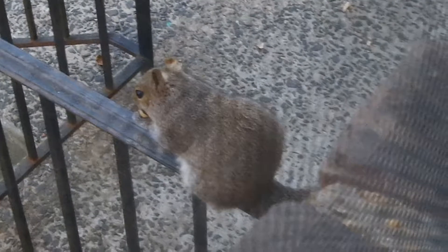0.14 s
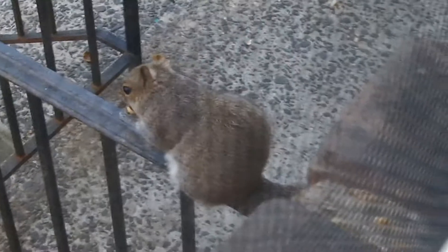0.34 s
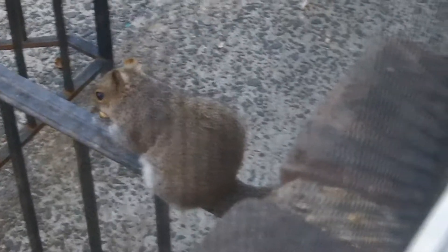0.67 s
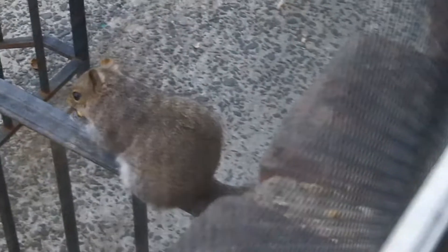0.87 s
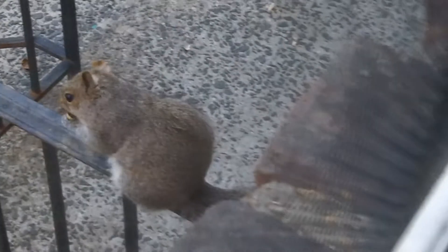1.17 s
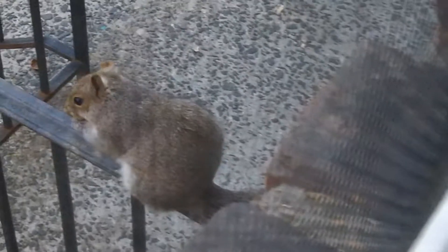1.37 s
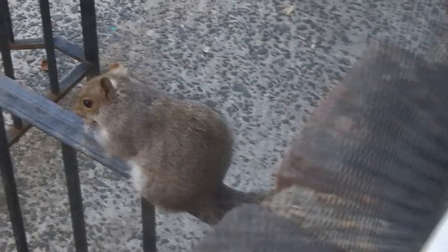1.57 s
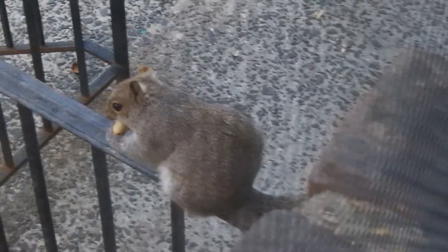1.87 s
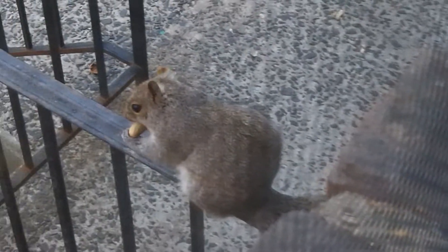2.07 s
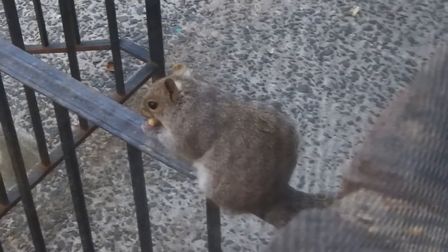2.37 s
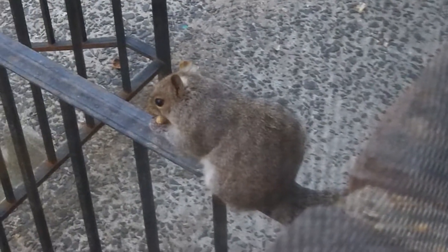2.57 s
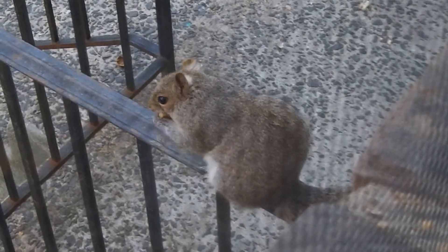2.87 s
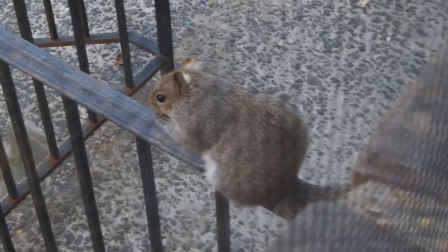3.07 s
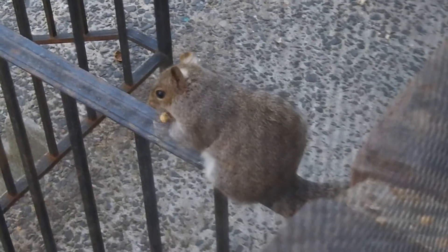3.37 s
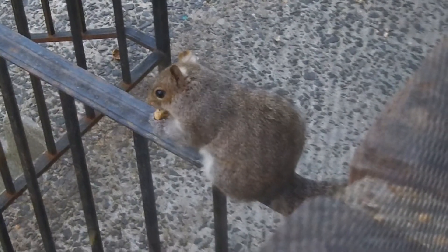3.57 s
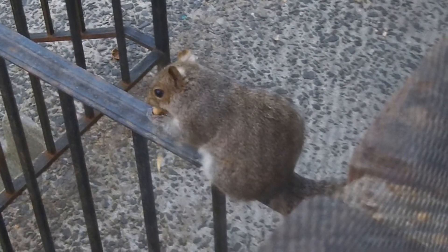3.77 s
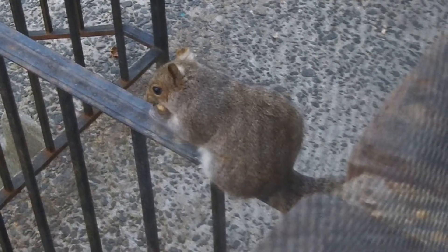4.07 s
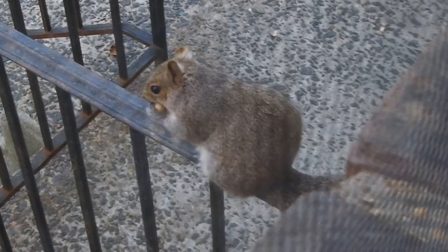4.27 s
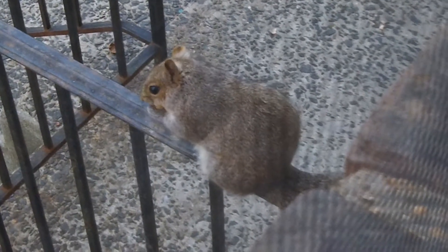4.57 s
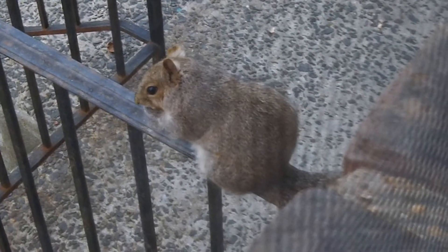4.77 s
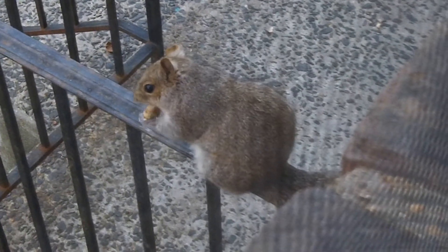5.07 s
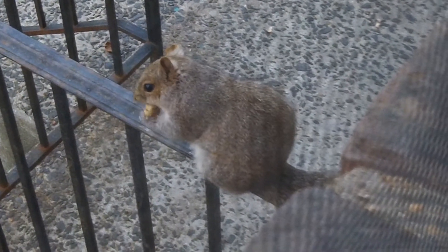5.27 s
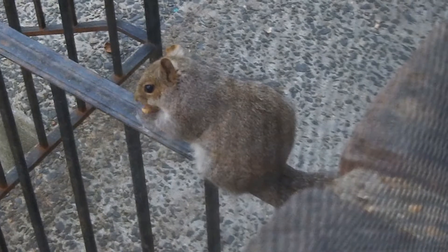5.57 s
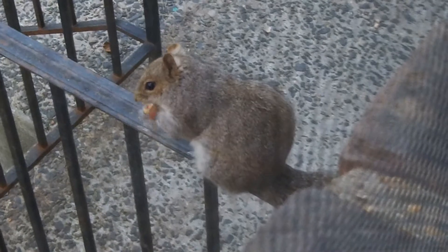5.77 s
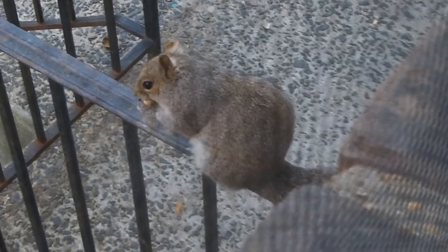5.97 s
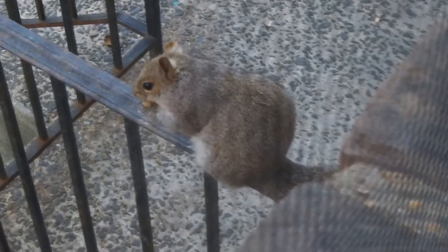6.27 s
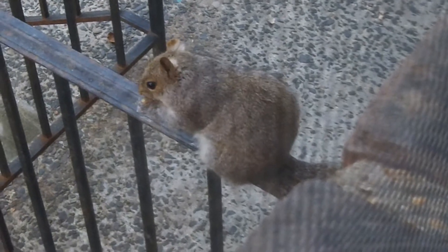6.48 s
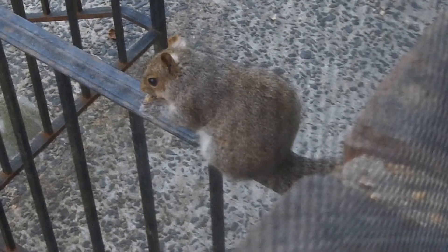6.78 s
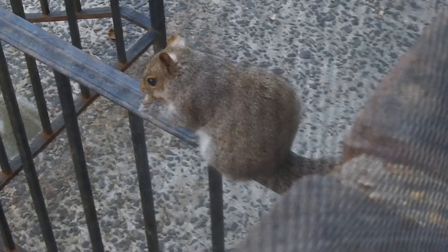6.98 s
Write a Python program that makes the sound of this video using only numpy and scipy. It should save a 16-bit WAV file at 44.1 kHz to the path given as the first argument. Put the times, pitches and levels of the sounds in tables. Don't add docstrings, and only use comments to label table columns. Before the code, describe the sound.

Outdoor mono sound with low distant traffic and soft hiss. Small teeth rasp and crack a hollow, papery nutshell: scratchy crunches first, sharp splintering snaps in the middle, lighter nips later. Paws rustle the nut faintly, and teeth occasionally squeak. One hard click-like tap on the microphone body overloads it late on; the level ducks and quickly recovers, with small scrapes and cracks to finish.

```python
import sys
import numpy as np
from scipy import signal
from scipy.fft import rfft, irfft, next_fast_len
from scipy.io import wavfile
from scipy.ndimage import uniform_filter1d, map_coordinates

SR = 44100
rng = np.random.default_rng(int(sys.argv[2]) if len(sys.argv) > 2 else 0)


def convert_level_to_amplitude(level_db):
    exponent = np.asarray(level_db, float) / 20
    return 10 ** exponent


def transcribe(u):
    v = np.clip(np.atleast_2d(u).T, -1, 1)
    q = np.round(v * 32767).astype(np.int16)
    wavfile.write(sys.argv[1], SR, q)


N = 314433

# f/Hz, width/Hz, level/dB
SHELL_MODES = [(545, 133, -7), (852, 172, -1), (1363, 304, -1.5), (2400, 830, -4.5), (3740, 710, -8)]


def unit(x):
    return x / np.sqrt(np.mean(x ** 2) + 1e-20)


def curve(rows):
    s, value = np.transpose(rows)
    return np.interp(np.arange(N) / SR, s, value)


def wobble(knots_per_s):
    knots = rng.standard_normal(int(N * knots_per_s / SR) + 4)
    return map_coordinates(knots, [np.arange(N) * knots_per_s / SR])


def filtered(x, response):
    m = next_fast_len(N + 8192)
    return irfft(rfft(x, m) * response(np.fft.rfftfreq(m, 1 / SR)), m)[:N]


def modes(table):
    def response(f):
        total = 0
        for k, (center_hz, width_hz, db) in enumerate(table):
            damping = 1j * f * width_hz
            total = total + (-1) ** k * convert_level_to_amplitude(db) * damping / (center_hz ** 2 - f * f + damping)
        return total
    return response


def rush(spectrum, patchy_db):
    z = signal.stft(rng.standard_normal(N), nperseg=512)[2]
    field = uniform_filter1d(rng.standard_normal(z.shape), 5, 0)
    field = uniform_filter1d(field, 10, 1)
    x = signal.istft(z * convert_level_to_amplitude(patchy_db * unit(field)), nperseg=512)[1][:N]
    hz, db = np.transpose(spectrum)
    return unit(filtered(x, lambda f: convert_level_to_amplitude(np.interp(np.log(f + 1), np.log(hz), db))))


def street():
    # f/Hz, density/dB
    traffic_spectrum = [(15, -24), (25, -8.5), (60, -9.5), (95, -5.5), (128, -10), (160, -1.5), (185, -5),
                        (208, -8), (240, -2.5), (280, -8.5), (400, -11.5), (700, -17), (1000, -18),
                        (1300, -66)]
    # f/Hz, density/dB
    air_spectrum = [(300, -13), (700, -2), (1500, -1.5), (3400, -8), (6700, -15.5), (11000, -19),
                    (13000, -19), (16500, -20)]
    # t/s, level/dB
    traffic_swell = [(0.0, -43.5), (0.44, -45), (4.19, -44), (4.35, -46), (5.98, -43), (6.13, -43.5),
                     (7.13, -44)]
    rumble = convert_level_to_amplitude(curve(traffic_swell) + 2) * rush(traffic_spectrum, patchy_db=-0.3)
    hiss = convert_level_to_amplitude(-46.5) * rush(air_spectrum, patchy_db=2.1)
    return rumble + hiss


def knock():
    # t/s, ring f/Hz, extra f at contact/Hz, peak/dB, t60/s
    blow_settings = (6.17805, 1060, 2400, 8, .00075)
    # delay/s, width/s, level/dB
    pulse_settings = (.00102, .00017, -15.5)
    s, hz, extra_hz, db, t60_s = blow_settings
    pulse_delay_s, pulse_width_s, pulse_db = pulse_settings
    glide_s = .00055
    t = np.maximum(np.arange(N) / SR - s, 0)
    onset = 1 - np.exp(-(t / .00026) ** 3)
    blow = convert_level_to_amplitude(db - 60 * np.maximum(t - .00068, 0) / t60_s) * onset
    cycles = hz * t + extra_hz * glide_s * (1 - np.exp(-t / glide_s))
    rattle_force = convert_level_to_amplitude(-11 - 60 * t / .025) * (t > 0) * rng.standard_normal(N)
    rattle = filtered(rattle_force, modes(SHELL_MODES))
    pulse = convert_level_to_amplitude(pulse_db) * np.exp(-((t - pulse_delay_s) / pulse_width_s) ** 2)
    return -blow * np.sin(2 * np.pi * cycles) + rattle + pulse


def squeaks():
    # t/s, length/s, first f/Hz, last f/Hz, level/dB
    clear_squeaks = [(1.175, .04, 6150, 6500, -28), (1.205, .04, 6500, 6750, -30),
                     (1.24, .13, 6620, 6750, -42), (1.35, .045, 6800, 7700, -50),
                     (3.88, .07, 3200, 3260, -42), (3.995, .14, 3060, 3100, -39),
                     (3.995, .028, 3700, 3640, -39), (4.025, .065, 3490, 3450, -41),
                     (5.06, .25, 6130, 6760, -56), (5.614, .008, 1800, 1700, -30),
                     (5.614, .009, 850, 780, -34), (4.985, .035, 6400, 6200, -52),
                     (3.93, .2, 6480, 6620, -56)]
    # t/s, length/s, first f/Hz, last f/Hz, level/dB
    rasping_squeaks = [(.505, 0.037, 4300, 3480, -39.5), (.536, 0.04, 3600, 4150, -40),
                       (.98, 0.13, 3200, 3180, -34.5), (3.7, 0.26, 3100, 3090, -43),
                       (3.73, 0.23, 8600, 8160, -49), (3.93, 0.38, 6380, 6900, -45),
                       (4.15, .1, 3700, 3640, -39), (5.54, .12, 4110, 3750, -43.5)]
    # share of length, level/dB
    slide_grip = [(0, -12), (.25, -1.5), (.7, -3.5), (1, -6)]
    out = np.zeros(N)
    for rows, fuzz in (clear_squeaks, .3), (rasping_squeaks, .5):
        waver = wobble(120)
        grip = 1 - fuzz + fuzz * (wobble(800) + .8 * wobble(2600))
        flutter = wobble(60)
        for s, length_s, first_hz, last_hz, db in rows:
            a, b = round(s * SR), round((s + length_s) * SR)
            u = np.linspace(0, 1, b - a)
            pitch_hz = (first_hz + (last_hz - first_hz) * u) * (1 + .012 * fuzz * waver[a:b])
            level_db = db + np.interp(u, *np.transpose(slide_grip)) + 2 + 3 * flutter[a:b]
            out[a:b] += convert_level_to_amplitude(level_db) * grip[a:b] * np.sin(2 * np.pi * np.cumsum(pitch_hz) / SR)
    return out


def fibres():
    # t/s, peak/dB, ring f/Hz, thud/dB
    crunches = [(0.0523, -18.5, 3530, -1), (0.6185, -25.5, 2540, 11), (1.1228, -23, 3320, -6),
                (1.14, -21, 2540, -3), (1.259, -14, 3150, 3), (1.3436, -16.5, 3660, -1.5),
                (1.3527, -25, 5640, -8), (1.695, -28, 2540, 2), (1.7064, -17, 5700, 4),
                (1.7062, -19, 2540, -2), (1.8208, -28, 3750, -9), (2.1054, -28, 3320, -6),
                (2.1778, -12.5, 2630, -1), (2.1812, -16, 3190, -7), (2.1987, -22, 3060, -1),
                (2.208, -22, 3490, 0), (2.2117, -26, 3620, -2), (3.2097, -16.5, 2920, -22),
                (4.2389, -21, 4740, -4), (4.3087, -28.5, 3660, -12), (4.4412, -23, 3300, -13),
                (4.8461, -30, 3700, -10), (5.6181, -35, 2540, 11), (6.623, -18.5, 3630, -11),
                (6.6562, -20.5, 5860, -7), (6.676, -31, 4520, -7), (6.718, -18, 3600, 0)]
    # t/s, peak/dB, ring f/Hz, neighbour/dB
    tears = [(2.4249, -7, 5470, -20), (2.444, -20, 4310, -20), (2.4519, -21, 4180, -5),
             (2.461, -23, 4440, -20), (2.468, -27, 6000, -20), (2.4725, -20, 4870, -4),
             (2.4922, -30, 4520, -20), (2.5023, -18, 4780, -5), (2.5115, -21, 4690, -20),
             (2.5248, -13.5, 4820, -12), (2.5326, -8, 4950, -10), (2.5406, -20, 4780, -20),
             (3.0575, -29, 5340, 1), (3.0774, -22, 4650, -20), (3.0946, -12, 4780, -6),
             (3.1167, -24, 4800, 11), (3.1248, -24, 4600, 6), (3.1317, -21, 4650, -20),
             (3.1378, -19, 4610, -5), (3.144, -10, 4870, -20), (3.1717, -26, 4570, 2),
             (3.1777, -17, 4690, -20), (3.1833, -13, 6800, -8), (3.1929, -24, 7190, -20),
             (3.2104, -13, 7190, -14), (3.4166, -17, 5040, -1), (2.427, -12, 4900, -20)]
    # t/s, peak/dB, ring f/Hz, neighbour/dB
    nibbles = [(4.2141, -30, 7190, -20), (4.2338, -21, 3620, -20), (4.2443, -32, 6000, 5),
               (4.2698, -21.5, 6800, 5.5), (4.4286, -15, 7640, -20), (4.4363, -19.5, 7440, -20),
               (4.4507, -25, 3700, 2), (4.4588, -23, 7100, -18), (4.4726, -22.5, 4650, -20),
               (4.6663, -16.5, 5200, -15), (4.8632, -30, 5000, -20), (4.8802, -24, 4650, -22),
               (4.915, -32, 5500, -20), (4.9385, -17.5, 4900, -14), (4.9538, -15.5, 7540, -23)]
    crunch_splinter_db, brittle_splinter_db, rim_brighter_db = -7, -10.5, 4
    brittle_thud_db, neighbour_delay_s, neighbour_spread_db = -18, .0035, .6
    pairs = [row + (brittle_splinter_db,) for row in tears]
    pairs += [row + (brittle_splinter_db + rim_brighter_db,) for row in nibbles]
    stray = convert_level_to_amplitude(neighbour_spread_db * rng.standard_normal(len(pairs)))
    out = [row + (crunch_splinter_db,) for row in crunches]
    for (s, db, hz, next_db, splinter_db), k in zip(pairs, stray):
        out.append((s, db, hz, brittle_thud_db, splinter_db))
        out.append((s + neighbour_delay_s, db + next_db, hz * k, brittle_thud_db, splinter_db))
    return out


def burst(t, life_s, hz):
    return t / life_s * np.exp(1 - t / life_s) * np.sin(2 * np.pi * hz * t)


def cracks():
    snaps, thuds = np.zeros(N + 900), np.zeros(N + 900)
    t = np.arange(880) / SR
    rows = fibres()
    noises = rng.standard_normal((len(rows), len(t)))
    for (s, db, hz, thud_db, splinter_db), noise in zip(rows, noises):
        ring = burst(t, .00014, hz)
        splinter = convert_level_to_amplitude(splinter_db + 2) * burst(t, .00011, 9000 * convert_level_to_amplitude(noise[1] * .8))
        rattle = (convert_level_to_amplitude(-8.5 - 60 * t / .003) + convert_level_to_amplitude(-22 - 60 * t / .03)) * noise
        thud = convert_level_to_amplitude(thud_db - 1) * burst(t, .00028, 1800 * convert_level_to_amplitude(noise[0] * 3.2))
        a = round(s * SR)
        snaps[a:a + len(t)] += convert_level_to_amplitude(db + 2) * (ring + splinter + rattle)
        thuds[a:a + len(t)] += convert_level_to_amplitude(db - 1.5) * thud
    fibre_band = signal.butter(N=3, Wn=[2350, 14000], btype="band", fs=SR, output="sos")
    return signal.sosfilt(fibre_band, snaps[:N]) + thuds[:N]


def scrapes():
    # hardest t/s, rise/ms, fall/ms, level/dB
    long_strokes = [(0.055, 21.4, 9.7, -31), (.37, 11, 19, -32), (.58, 22, 14, -37), (1.018, 41, 10, -45),
                    (1.045, 13, 15, -45), (1.1, 30, 18, -34), (1.14, 16, 17, -29), (1.224, 7.7, 60, -33.5),
                    (1.342, 24, 19, -31.5), (1.675, 34, 12, -27.5), (1.711, 18.7, 7.4, -18),
                    (1.834, 23, 12, -37.5), (2.088, 9.9, 24, -26.5), (2.201, 22, 9.1, -20),
                    (2.315, 6.2, 42, -41), (2.66, 18, 6.9, -43.5), (3.454, 18, 7, -39),
                    (3.481, 9.7, 19, -39), (4.234, 13, 9.3, -34), (4.645, 11, 32, -46),
                    (5.741, 8.6, 19, -30), (5.775, 18, 14, -32), (5.953, 25, 13, -45), (6.067, 15, 21, -43),
                    (6.444, 7.5, 12, -37.5)]
    # hardest t/s, level/dB
    short_nips = [(0.097, -36), (.333, -42.5), (.617, -33.5), (1.405, -39), (1.638, -39), (2.021, -28),
                  (2.139, -35), (2.23, -22.5), (2.264, -29), (2.285, -38), (2.89, -41), (2.975, -37),
                  (3.577, -30), (4.128, -51), (4.201, -36), (4.398, -32), (5.868, -41.5), (6.351, -25),
                  (1.976, -46), (3.925, -45), (6.607, -36), (6.629, -34.5), (6.655, -32), (6.695, -35.5),
                  (6.719, -29)]
    # hardest t/s, fall/ms, grit level/dB
    dry_rubs = [(.772, 22, -45), (2.427, 18, -35), (2.471, 16.5, -24), (2.537, 20, -27.5),
                (3.059, 8.1, -34.5), (3.097, 8.4, -29), (3.127, 41, -32), (3.216, 19, -36),
                (3.417, 8.2, -25.5), (4.436, 26, -47), (4.85, 14, -43), (5.322, 4.9, -42), (5.348, 5, -41),
                (5.56, 20, -40.5), (5.811, 7, -40), (6.118, 8, -37.5), (6.79, 15, -42)]
    stroke_shine_db, nip_shine_db, rub_shine_db = -5, -7.5, 14
    nip_rise_ms, nip_fall_ms, rub_rise_ms = 8.5, 5.5, 8
    out = [row + (stroke_shine_db,) for row in long_strokes]
    out += [(s, nip_rise_ms, nip_fall_ms, db, nip_shine_db) for s, db in short_nips]
    out += [(s, rub_rise_ms, fall_ms, db - rub_shine_db, rub_shine_db) for s, fall_ms, db in dry_rubs]
    return out


def slips(clump_db, spike_db):
    spikes = np.minimum(rng.exponential(size=N), 5)
    return unit(convert_level_to_amplitude(clump_db * wobble(450) + spike_db * spikes) * rng.standard_normal(N))


def gnawing():
    # t/s, rustle/dB
    paw_rustle = [(0, -51), (.87, -45.5), (1.21, -37.5), (1.39, -62), (1.98, -56), (2.36, -50), (2.62, -51),
                  (3.83, -49), (4.15, -42), (4.65, -49), (6.02, -56), (6.35, -54), (6.51, -49.5),
                  (7.13, -66)]
    # f/Hz, width/Hz, level/dB
    grit_modes = [(5500, 2100, -3.5), (6510, 2160, 8.5), (7000, 4800, 4.5), (11900, 4600, -5),
                  (14300, 2000, -45)]
    paw_db = curve(paw_rustle)
    dull, bright = convert_level_to_amplitude(paw_db - 4.5), convert_level_to_amplitude(paw_db - 10)
    for s, rise_ms, fall_ms, db, shine_db in scrapes():
        knots_ms = np.array([-1.3 * rise_ms - 3, -rise_ms, 0, fall_ms, 1.3 * fall_ms + 5])
        knots_s = s + knots_ms / 1000
        a, b = (np.clip(knots_s[[0, -1]], 0, None) * SR).astype(int)
        stroke = np.interp(np.arange(a, b) / SR, knots_s, [0.025, 0.45, 0.94, 0.5, 0.15])
        dull[a:b] += convert_level_to_amplitude(db - 3) * stroke
        bright[a:b] += convert_level_to_amplitude(db + shine_db - 5.5) * stroke
    force = slips(clump_db=3, spike_db=3.5)
    hollow = unit(filtered(force, modes(SHELL_MODES)))
    grit = unit(filtered(force, modes(grit_modes)))
    return dull * hollow + bright * grit


def scene():
    return (street() + knock() + squeaks() + cracks() + gnawing())[None]


def roll_off(x):
    return signal.sosfilt(signal.butter(12, 16660, fs=SR, output="sos"), x)


def record(dry):
    # f/Hz, width/Hz
    port_notch = (8090, 850)
    hz, width_hz = port_notch

    def notch(f):
        detuning, damping = hz * hz - f * f, 1j * f * width_hz
        return (detuning + .02 * damping) / (detuning + damping)

    x = filtered(dry[0], notch)
    x = signal.sosfilt(signal.butter(N=9, Wn=15400, fs=SR, output="sos"), x)
    over_db = np.maximum(20 * np.log10(np.abs(x) + 1e-9) + 3, 0) * 1.9
    recovery_db = 115 * np.arange(N) / SR
    duck_db = np.maximum.accumulate(over_db + recovery_db) - recovery_db
    duck_db = uniform_filter1d(np.pad(duck_db, (130, 0))[:N], 130)
    bass = filtered(x, lambda f: 1 / (1 + (f / 350) ** 4))
    x = bass * convert_level_to_amplitude(-.55 * duck_db) + (x - bass) * convert_level_to_amplitude(-duck_db)
    x = x / (1 + np.abs(x / .7) ** 8) ** (1 / 8)
    return roll_off(x[None])


dry = scene()
out = record(dry)
transcribe(out)
```